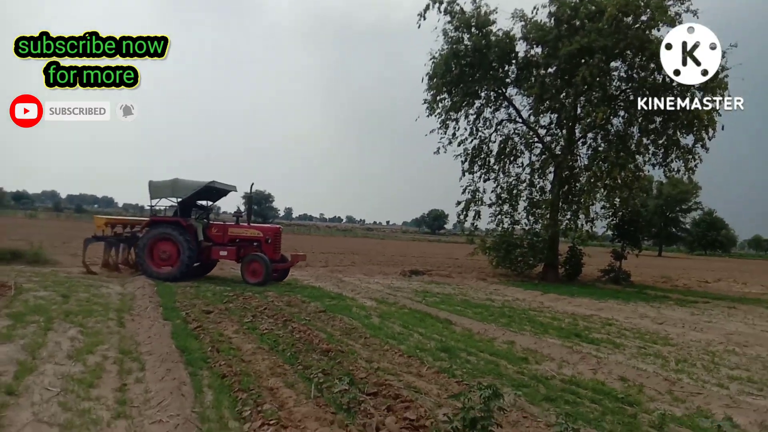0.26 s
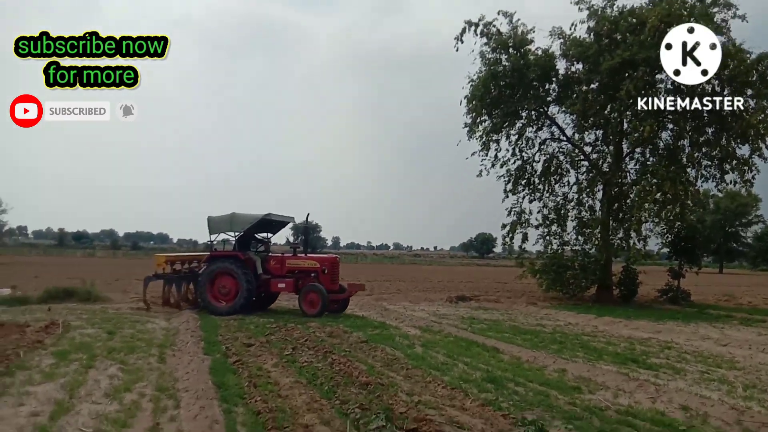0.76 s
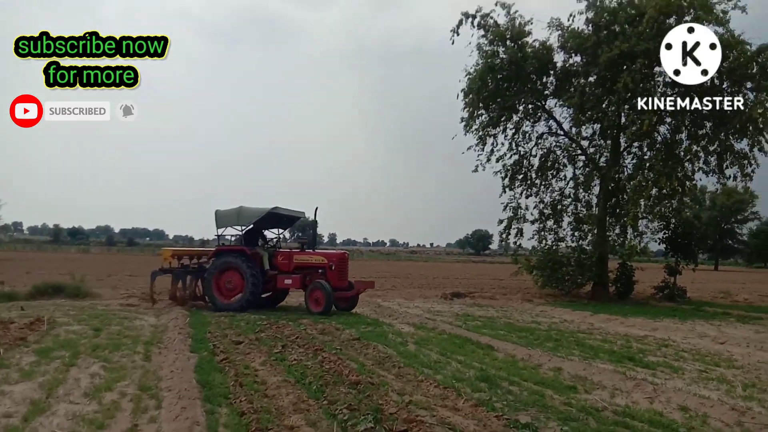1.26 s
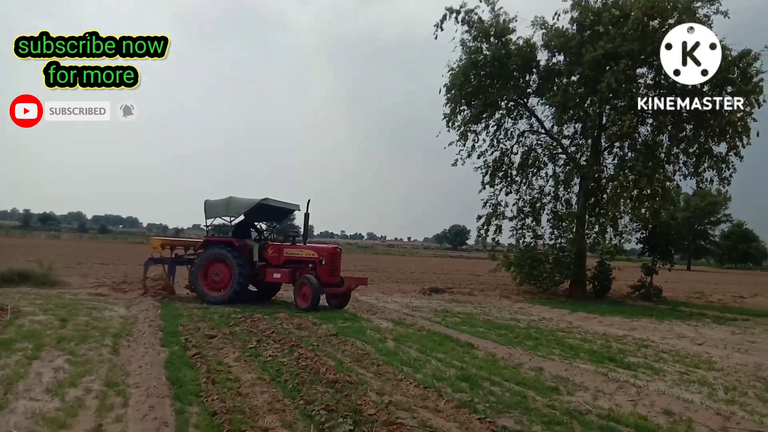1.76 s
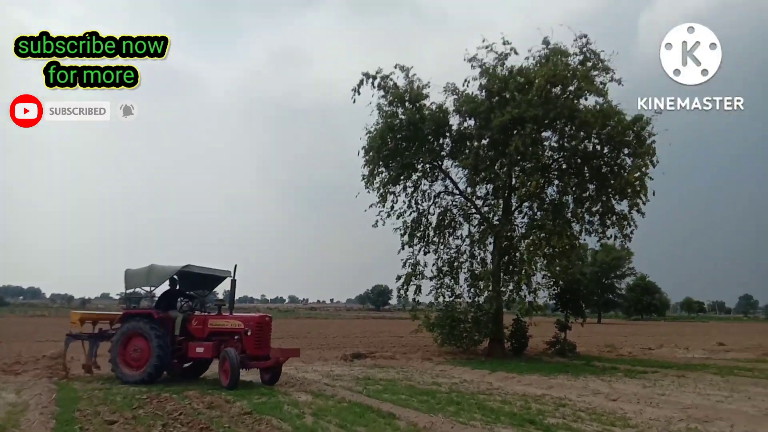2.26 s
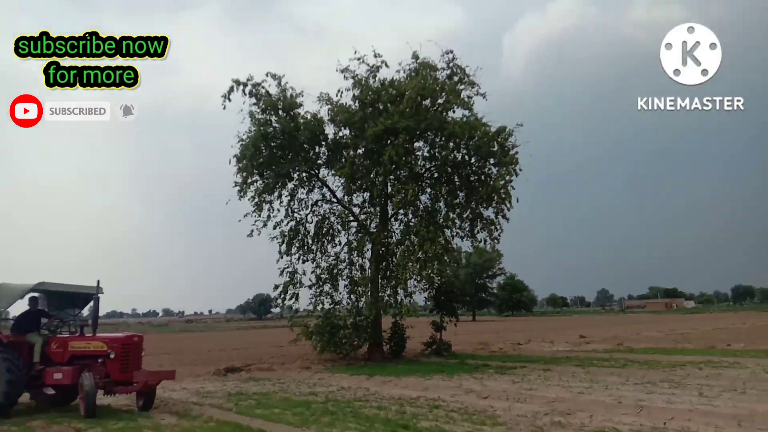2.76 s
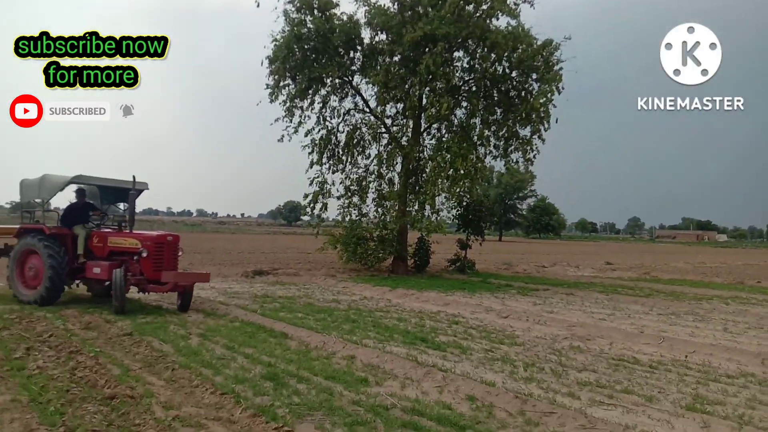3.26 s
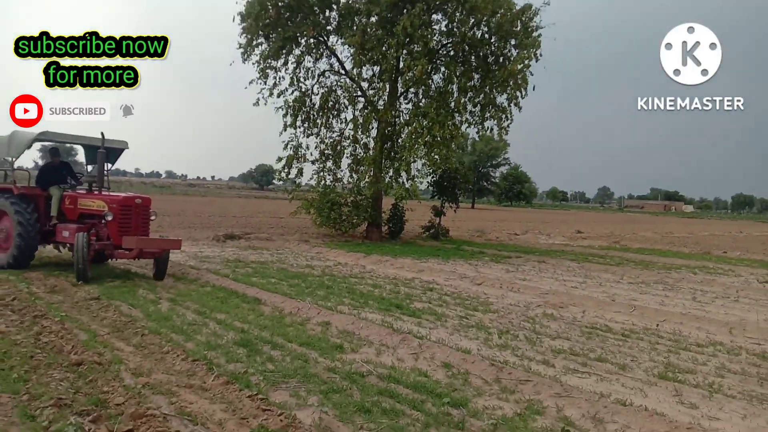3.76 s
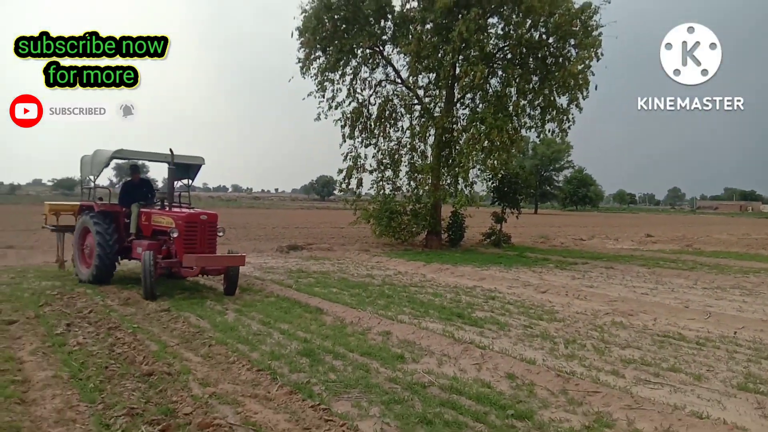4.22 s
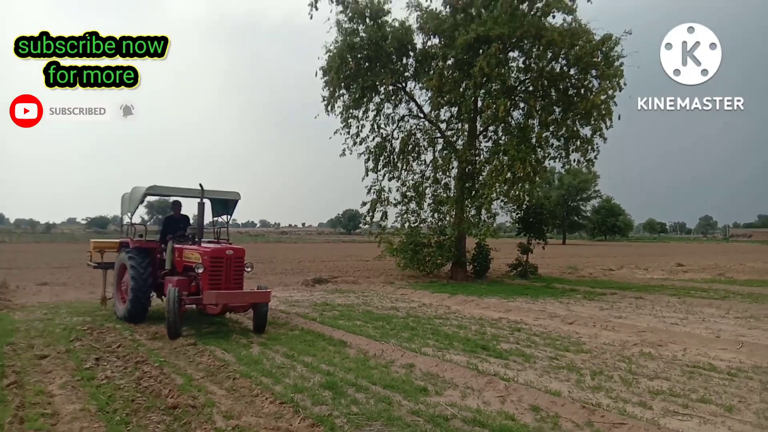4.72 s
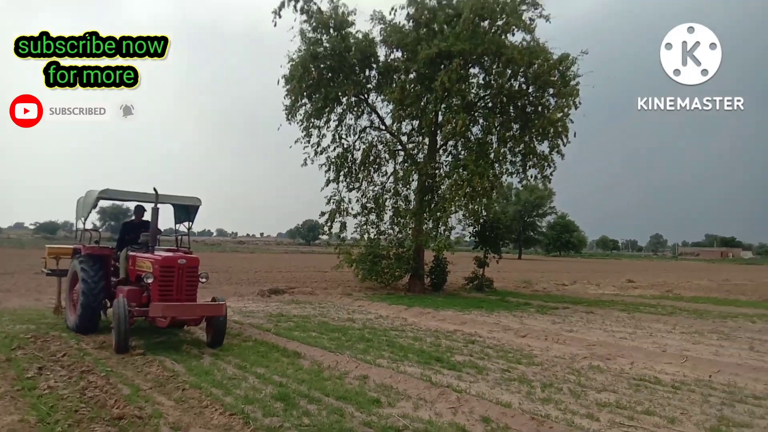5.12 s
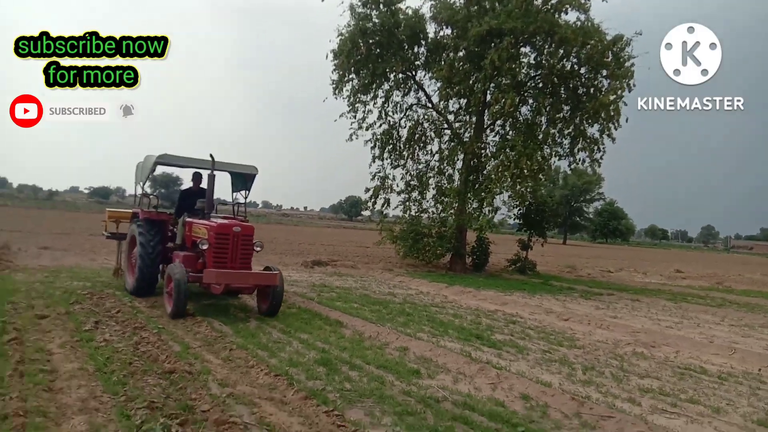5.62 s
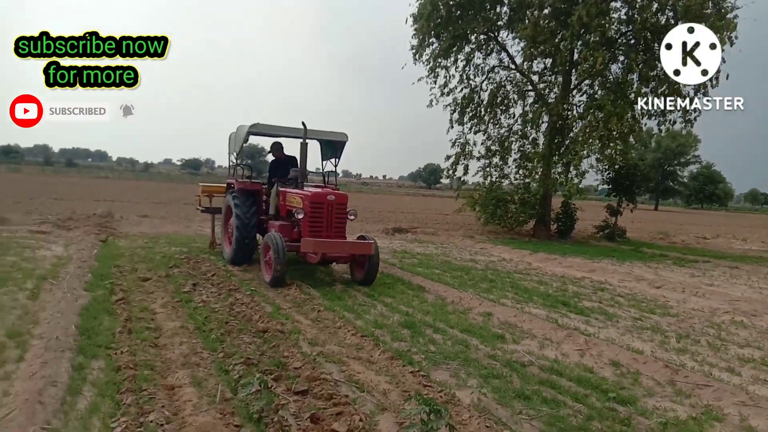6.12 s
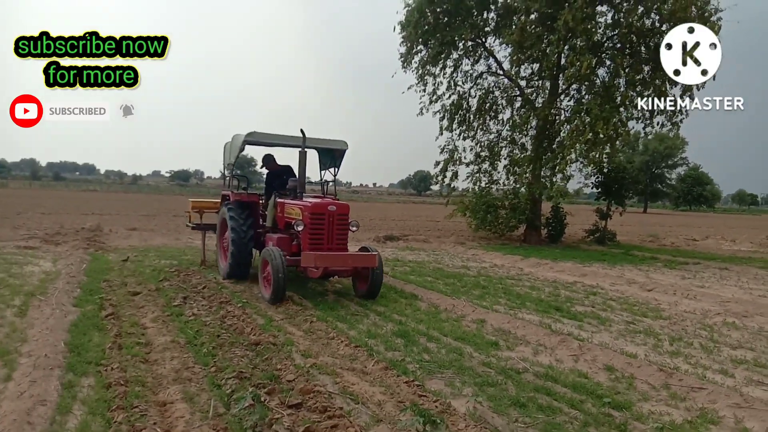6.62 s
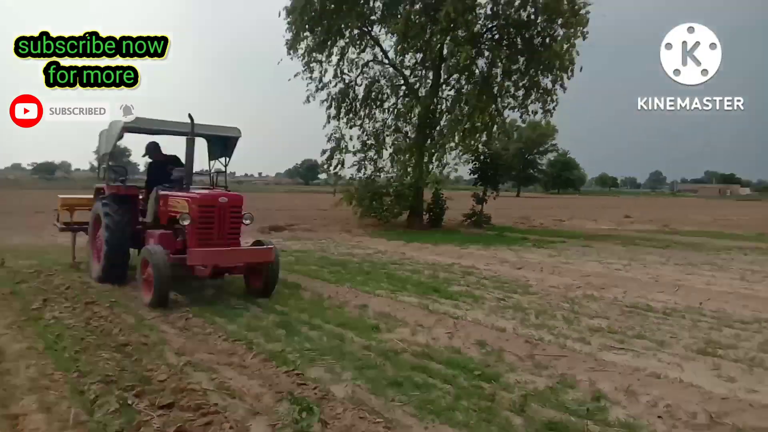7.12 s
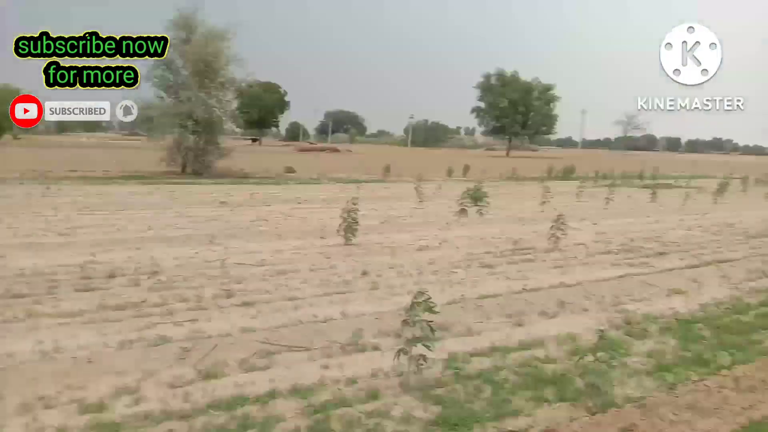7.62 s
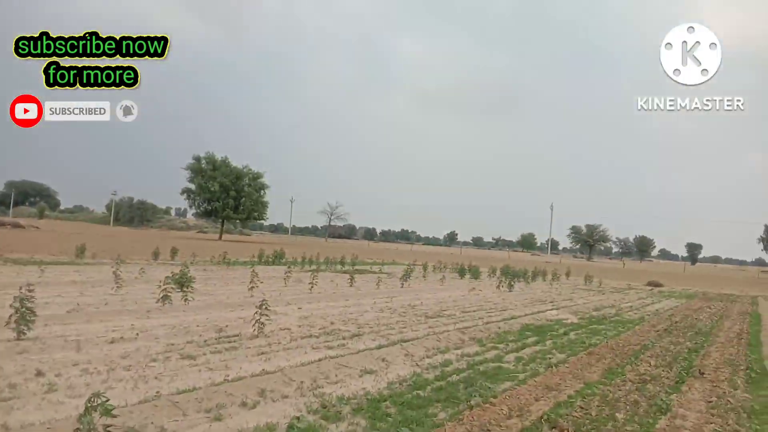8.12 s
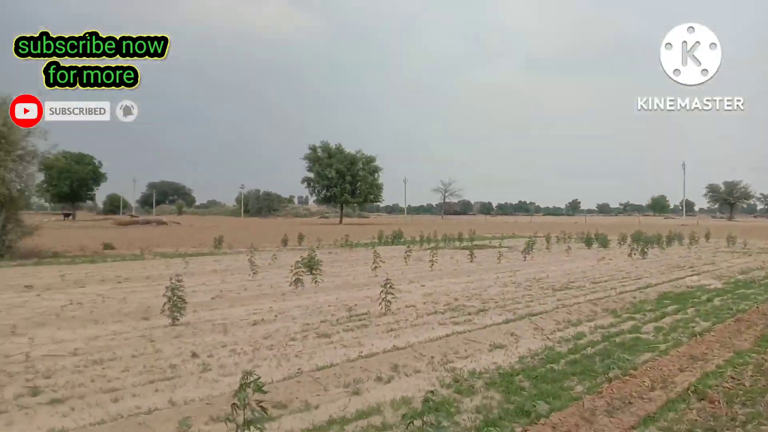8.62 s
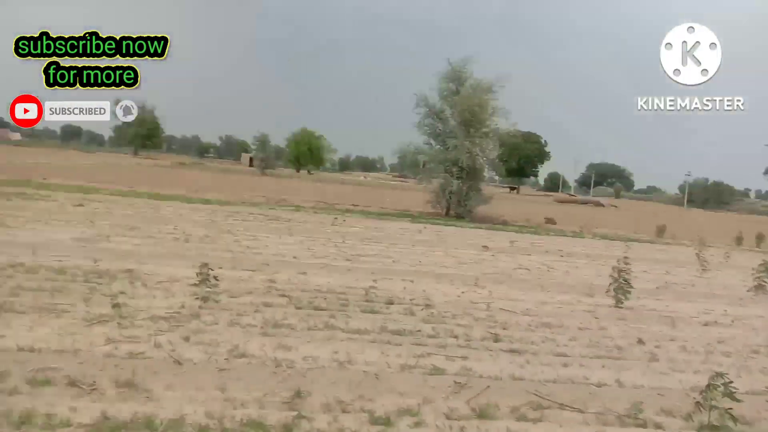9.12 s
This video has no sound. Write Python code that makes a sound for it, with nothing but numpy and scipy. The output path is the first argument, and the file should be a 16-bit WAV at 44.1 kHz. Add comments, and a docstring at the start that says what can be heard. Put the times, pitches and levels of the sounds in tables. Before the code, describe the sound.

A diesel tractor knocks and rattles nearer across a windy open field, gusts thumping the microphone, then revs up close and clear in shelter.

```python
"""Wind buffets the microphone in an open field as a diesel tractor draws near, pulling a seed drill.
Each firing knocks on the block and puffs from the exhaust; gears and drill rattle in between.
A small bird chips early on; dry ticks follow close by. Gusts slap the port and a limiter ducks the engine.
After seven seconds metal squeaks, the microphone turns into some shelter and the engine speeds up, close by.
Pulsed noise, ringing modes and sines make the machine; shaped noise and single pops make the wind."""
import sys
import numpy as np
from scipy import signal
from scipy.fft import rfft, irfft, next_fast_len
from scipy.io import wavfile
from scipy.ndimage import uniform_filter1d

SR = 44100
rng = np.random.default_rng(int(sys.argv[2]) if len(sys.argv) > 2 else 0)


def generate_wav(sig):
    """Save sig (samples, or channels by samples) to the path in sys.argv[1] as 16-bit PCM at SR."""
    pcm = np.round(np.clip(np.atleast_2d(sig).T, -1, 1) * 32767).astype(np.int16)
    wavfile.write(sys.argv[1], SR, pcm)


N = 413658
TIME = np.arange(N) / SR  # s

# engine speed: start_s, firing_rate [firings per s]
ENGINE_SPEED = [(0.0, 27.28), (0.4, 28.49), (0.8, 27.35), (2.4, 27.71), (3.2, 27.33), (4.8, 27.5),
                (5.2, 28.22), (5.6, 27.47), (6.4, 28.13), (6.85, 27.83), (7.8, 31.05), (8.6, 32.48),
                (9.38, 32.9)]
# engine as the tractor nears and the microphone turns: start_s, knock_db, clatter_db [relative levels]
ENGINE_LEVEL = [(0, -35.5, -43.5), (2.4, -30, -40.5), (4, -30, -39.5), (4.9, -29.5, -42.5),
                (5.7, -30.5, -41.5), (6.4, -26, -37.5), (7.2, -25, -41), (7.4, -20.5, -36.5),
                (7.55, -19.5, -31), (7.9, -29, -36.5), (8.2, -27, -31), (8.65, -24, -32.5),
                (9.0, -21, -31.5), (9.38, -20, -33.5)]
BREEZE_DB = -12.5  # strength of a fresh breeze, the reference for the wind


def tractor():
    """Knock, clatter, gears, hiss and exhaust all follow the crankshaft."""
    # spells in which the strokes flare brighter or fade: centre_s, half_length_s, gain_db
    flares = [(.85, 0.13, 2.5), (1.203, 0.043, 7), (1.884, 0.021, 10), (2.46, 0.081, 15.5),
              (2.78, 0.099, 6.5), (3, 0.044, 6), (3.316, 0.079, 9), (3.8, 0.33, 1.5), (4.14, 0.093, -4),
              (4.665, 0.023, 11), (4.944, 0.092, 11), (5.617, 0.029, 7.5), (7.043, 0.12, 15.5),
              (7.15, 0.022, -7), (7.317, 0.055, 13), (7.424, 0.022, -6), (7.777, 0.042, 7),
              (8.024, 0.028, 12)]
    # turbulent air makes the distant engine flicker, less so close by: start_s, share [0-1]
    flicker_share = [(0, 1), (7.1, 1), (7.7, .42), (8.6, .42), (8.9, .6), (9.38, .6)]
    # top treble of the strokes: start_s, level_db [before the flares]
    hiss_level = [(0, -65), (1.2, -60), (2.1, -59), (2.5, -67), (3.2, -63), (3.8, -60), (4.8, -67),
                  (5.3, -69), (6.2, -60), (7.2, -59.5), (7.7, -49.5), (8.3, -54), (8.85, -49), (9.2, -63),
                  (9.38, -64)]
    # colour of that treble: pitch_hz, density_db [relative, per Hz]
    hiss_spectrum = [(6500, 6), (8000, 6), (9500, -1), (10600, -15.5), (11800, -5.5), (13600, -17),
                     (14500, -1.5), (15200, 2.5), (15800, -4.5)]
    # exhaust note: start_s, level_db
    exhaust_level = [(0, -31), (4, -30), (5, -31), (7.2, -20), (7.8, -29.5), (8.5, -27.5), (8.8, -28.5),
                     (9.38, -22)]

    knock_db, clatter_db = in_time(ENGINE_LEVEL)
    flare_db = sum(db * bell(s, half_s) for s, half_s, db in flares)
    flicker, = in_time(flicker_share)
    turns = .52 + np.cumsum(in_time(ENGINE_SPEED)[0]) / SR  # counted in firings
    clicks = firings(turns, uneven_db=1.6 * flicker, alternate_db=.6, jitter_s=0.0006)

    block = from_db(knock_db) * knock(clicks, ring_db=-10.0, thud_db=-11.0, shift_db=3.3 * flicker)
    metal = clatter(clicks, shift_db=4.2 * flicker, ring_db=-3)
    valves = from_db(clatter_db + 0.77 * flare_db - 4.0) * metal  # clatter takes part of each flare
    strokes = bursts(clicks, rise_s=0.0044, decay_s=0.0061, between=0.19, grain_db=5.0)
    hiss = from_db(in_time(hiss_level)[0] + flare_db) * colour(noise() * strokes, hiss_spectrum)
    thrum = from_db(in_time(exhaust_level)[0]) * exhaust(turns, rough_db=3 * flicker)
    gear = running_gear(level_db=-35.5, clicks=clicks)
    return shadow(block + gear + reflection(valves) + sizzle(clicks)) + hiss + thrum


def firings(turns, uneven_db, alternate_db, jitter_s):
    """One click per firing, strong and weak in turn, each a little different in time and force."""
    at = np.flatnonzero(np.diff(np.floor(turns)))
    late, force = rng.standard_normal((len(at), 2)).T
    places = np.clip(at + (late * jitter_s * SR).astype(int), 0, N - 1)
    clicks = np.zeros(N)
    clicks[places] = from_db(uneven_db[at] * force + alternate_db * np.cos(np.pi * turns[at]))
    return clicks


def bursts(clicks, rise_s, decay_s, between, grain_db):
    """Envelope: each firing sets off a quick flurry of metal impacts over the steady rattle of the gears."""
    age = TIME[:SR // 10]
    swell = (1 - np.exp(-(age / rise_s) ** 2)) * np.exp(-age / decay_s)
    envelope = signal.fftconvolve(clicks, swell / swell.max())[:N]
    return np.sqrt(envelope ** 2 + between ** 2) * from_db(grain_db * drift(1500))


def knock(clicks, ring_db, thud_db, shift_db):
    """Combustion rings the modes of the block, in a new mix every stroke, over a dense spread of weaker ones."""
    # ringing of block and bonnet: pitch_hz, width_hz, level_db [relative]
    block_modes = [(540, 160, -9), (1010, 100, -11), (1248, 65, 2), (1618, 70, -1), (1820, 220, -7),
                   (2210, 70, 0), (2530, 260, -9), (2930, 70, -12)]
    # the dense spread: pitch_hz, density_db [relative, per Hz]
    thud_spectrum = [(200, -13.5), (400, -9), (800, 2.5), (1300, 10), (1900, 10), (2600, -6), (3200, -16.5),
                     (4200, -41)]
    blows = bursts(clicks, rise_s=.005, decay_s=.006, between=.15, grain_db=1.5)
    modes = ringing(blows * noise(), block_modes, shift_db, drift_rate=31)
    modes = signal.sosfilt(signal.butter(2, 3200, fs=SR, output="sos"), modes)
    return from_db(ring_db) * rms_one(modes) + from_db(thud_db) * colour(blows * noise(), thud_spectrum)


def ringing(drive, modes, shift_db, drift_rate):
    """Modes of alternating sign ring together, each wandering in strength."""
    out = 0
    for k, (hz, width_hz, db) in enumerate(modes):
        strength = from_db(db + shift_db * drift(drift_rate))
        out = out + (-1) ** k * strength * resonance(drive, hz, width_hz)
    return out


def clatter(clicks, shift_db, ring_db, count=16):
    """Injectors and valve gear rattle in many bands and ring the cover, a few standing out at each stroke."""
    # ringing of valve cover and injector pipes: pitch_hz, width_hz, level_db [relative]
    cover_modes = [(2560, 110, 1), (2850, 90, -2), (3550, 50, -3), (3840, 45, -2), (4085, 60, -1),
                   (4350, 110, -2), (4980, 150, -4), (5450, 160, -7)]
    # colour of the rattle: pitch_hz, density_db [relative, per Hz]
    rattle_spectrum = [(2000, -12.5), (2800, 8), (3500, 4.5), (4200, 3.5), (5000, -5.5), (5900, -2),
                       (6600, -3), (7400, -1.5), (8300, -11), (9500, -28), (11000, -44.5)]
    strokes = bursts(clicks, rise_s=.0045, decay_s=.0095, between=.15, grain_db=2.2)
    edges_hz = np.geomspace(2200, 10000, count + 1)
    white = noise(), noise()  # neighbouring bands take turns, so they stay independent
    rattle = 0
    for k in range(count):
        band = signal.butter(2, edges_hz[k:k + 2], "band", fs=SR, output="sos")
        rattle = rattle + signal.sosfilt(band, white[k % 2]) * from_db(shift_db * drift(20.0))
    ring = ringing(strokes * noise(), cover_modes, shift_db, drift_rate=25)
    ring = signal.sosfilt(signal.butter(2, [2000, 6500], "band", fs=SR, output="sos"), ring)
    return rms_one(colour(rattle * strokes, rattle_spectrum) + from_db(ring_db) * rms_one(ring))


def exhaust(turns, rough_db):
    """Low harmonics of the firing rate waver in strength; the pipe favours those nearest its own note."""
    # exhaust harmonics: multiple [of the firing rate], level_db [relative, before the pipe]
    harmonics = [(.5, -20), (1, -18), (1.5, -13), (2, 2), (2.5, -9), (3, 0), (3.5, -11), (4, 1), (4.5, -9),
                 (5, -9), (5.5, -13), (6, -13), (6.5, -12), (7, -11), (8, -14), (10, -13), (12, -11)]
    pipe_hz, pipe_width_hz = 112, 50
    rate, = in_time(ENGINE_SPEED)
    out = 0
    for k, db in harmonics:
        pipe = 1 / np.sqrt(1 + (2 * (k * rate - pipe_hz) / pipe_width_hz) ** 2)
        tone = np.sin(2 * np.pi * (k * turns + rng.random()))
        out = out + pipe * from_db(db + rough_db * drift(6)) * tone
    return rms_one(out)


def running_gear(level_db, clicks):
    """Gears, tyres and tines drone, louder as the tractor nears; the gears whine, jolted by each firing."""
    # even drone: pitch_hz, density_db [relative, per Hz]
    drone_spectrum = [(300, -9.5), (520, 4.5), (720, -1), (1000, 3.5), (1500, -4), (2500, -3), (3400, -19)]
    # gear whine: pitch_hz, width_hz
    whine_bands = [(1255.5, 94), (1610, 140), (2225, 92)]
    # each whine as the tractor turns: start_s, low_db, middle_db, high_db
    whine_level = [(0, -47.5, -49, -54.5), (3.8, -41.5, -45, -59), (4.5, -37, -49, -52),
                   (5.0, -38.5, -45, -39), (5.6, -49, -42, -49), (6.4, -37, -48, -37),
                   (7.5, -39, -44, -43.5), (8.5, -47, -53, -51), (9.38, -29, -29, -34)]
    knock_db = in_time(ENGINE_LEVEL)[0]
    nearness_db = .5 * (knock_db - knock_db.mean())
    drone = from_db(level_db + nearness_db) * colour(noise() * from_db(2.85 * drift(59)), drone_spectrum)
    jolts = bursts(clicks, rise_s=.003, decay_s=.007, between=.4, grain_db=1)
    whine = 0
    for (hz, width_hz), db in zip(whine_bands, in_time(whine_level)):
        once = resonance(jolts * noise(), hz, width_hz)
        whine = whine + from_db(db) * rms_one(resonance(once, hz, width_hz))
    return drone + whine


def sizzle(clicks):
    """Bright edge of each stroke, heard only with the port towards the engine; its colour follows the turn."""
    # extra treble while the port points at the engine: start_s, level_db [relative]
    facing = [(7.4, -86), (7.6, -49), (7.8, -42), (8.25, -37.5), (8.6, -38), (8.9, -45), (9.1, -54),
              (9.38, -83)]
    # its colour when pointing straight at the engine: pitch_hz, density_db [relative, per Hz]
    straight_spectrum = [(2700, -10), (3600, 4), (4400, 7.5), (5700, -3.5), (6600, -6.5), (8000, -21),
                         (9200, -17.5), (10500, -17.5), (12500, -30.5), (14000, -34), (15500, -40)]
    strokes = bursts(clicks, rise_s=0.0033, decay_s=0.0037, between=0.26, grain_db=-2)
    points_hz, points_db = np.transpose(straight_spectrum)

    def colour_db(hz, s):
        # the whole spectrum slides in pitch with the cancelled band
        centre_hz = shadow_at(s)[0]
        straight_hz = np.maximum(hz, 1) * centre_hz.max() / centre_hz
        low_cut_db = 40 * np.log10(np.minimum(straight_hz / points_hz[0], 1))
        return np.interp(np.log(straight_hz), np.log(points_hz), points_db) + low_cut_db

    return from_db(in_time(facing)[0] + 0.5) * rms_one(sliding(noise() * strokes, colour_db))


def reflection(x):
    """A close echo combs the treble; the stripes slide as its path changes."""
    # echo as tractor and microphone move: start_s, lag_ms, strength [0-1]
    echo_path = [(0, .98, .25), (2.1, .96, .25), (2.3, .78, .2), (2.6, .83, .4), (3.3, .86, .5),
                 (3.8, .97, .6), (4.2, 1.12, .5), (4.6, 1.06, .05), (5.2, 1, .1), (5.6, .97, .2),
                 (7, .97, .2), (7.4, .97, 0)]
    lag_ms, strength = in_time(echo_path)
    fine = signal.resample_poly(x, 4, 1)  # finer steps for a smooth moving delay
    echo = np.interp(TIME - lag_ms / 1000, np.arange(4 * N) / (4 * SR), fine)
    return (x + strength * echo) / np.sqrt(1 + strength ** 2)


def shadow_at(s):
    """Sound bending round the recorder cancels a band that slides as it turns: its centre and depth."""
    # cancelled band: start_s, centre_hz, depth_db
    shadow_path = [(0, 3300, 7), (.5, 3400, 7), (.9, 3680, 10), (1.5, 3500, 6), (2.05, 3450, 5),
                   (2.3, 4400, 9), (2.8, 4150, 6), (3.5, 4050, 4), (4.15, 3200, 7), (4.7, 3050, 4),
                   (5.2, 3250, 5), (5.8, 3580, 10), (6.8, 3550, 10), (7.2, 3400, 4), (7.38, 4900, 8),
                   (7.6, 5150, 13), (7.8, 6000, 8), (8.1, 6350, 6), (8.7, 6300, 6), (9.0, 5750, 12),
                   (9.15, 5200, 14), (9.38, 4800, 12)]
    at, hz, depth_db = np.transpose(shadow_path)
    return np.interp(s, at, hz), np.interp(s, at, depth_db)


def shadow(x):
    """The cancelled band sweeps through the engine's treble."""
    width = .085  # share of the centre pitch

    def dip_db(hz, s):
        centre_hz, depth_db = shadow_at(s)
        return -depth_db * np.exp(-((hz / centre_hz - 1) / width) ** 2)

    return sliding(x, dip_db)


def squeak(waver):
    """Dry metal rubs and sings for a moment, a sine of wavering pitch."""
    # brief squeak: start_s, level_db
    squeak_level = [(7.15, -80), (7.2, -41), (7.24, -33), (7.28, -55), (7.35, -97)]
    pitch_hz = 7040 * (1 + waver * drift(120))
    level_db, = in_time(squeak_level)
    sounding = (TIME > squeak_level[0][0]) & (TIME < squeak_level[-1][0])
    return sounding * from_db(level_db) * np.sin(2 * np.pi * np.cumsum(pitch_hz) / SR)


def wind(rumble_db, buffet_db, lumps_db, eddies_db, sway_db, sway_follows, flutter_db):
    """Eddies at the microphone port: a lumpy rumble, with sharper flaps in the strong gusts."""
    # wind colours, from the largest eddies to the smallest: pitch_hz, density_db [relative, per Hz]
    sway_spectrum = [(15, -12.5), (32, -7.5), (48, -9), (62, 2.5), (90, 15), (160, -8)]
    rumble_spectrum = [(20, -41), (33, -34.5), (45, -60), (58, -15), (78, -2.5), (120, 2), (180, 0),
                       (260, -5), (360, -12), (600, -52.5)]
    buffet_spectrum = [(150, 0.5), (250, 1), (340, 0), (480, -3), (700, -14), (1000, -22), (1400, -44.5),
                       (2200, -87)]
    flutter_spectrum = [(400, 0.5), (650, 12.5), (900, 3.5), (1250, 6), (1550, -8), (2400, -41.5)]
    buffet_growth, flutter_growth = 1.74, 3.66  # dB per dB of wind: stronger wind is brighter
    force_db = wind_strength() - BREEZE_DB
    lumps = lumps_db * drift(49)
    flaps = from_db(lumps + eddies_db * np.tanh(drift(240)))
    rumble = from_db(rumble_db + force_db) * colour(noise() * from_db(lumps), rumble_spectrum)
    buffet = from_db(buffet_db + buffet_growth * force_db) * colour(noise() * flaps, buffet_spectrum)
    # large slow eddies outlast the lulls; the smallest stand out only in the hardest gusts
    sway = from_db(sway_db + sway_follows * force_db) * colour(noise(), sway_spectrum)
    flutter = from_db(flutter_db + flutter_growth * force_db) * colour(noise() * flaps, flutter_spectrum)
    return sway + rumble + buffet + flutter


def wind_strength():
    """The wind in dB: a slow swell, with brief lulls cut out of it and gusts laid on top."""
    # swell, falling away as the microphone finds shelter: start_s, strength_db
    wind_swell = [(0, -13.5), (.55, -18), (.7, -15.5), (.8, -7), (1.0, -13), (1.55, -13.5), (2.15, -18.5),
                  (2.3, -12.5), (2.42, -5.5), (2.52, -8.5), (2.64, -4.5), (2.78, -11), (2.95, -12),
                  (3.42, -10), (3.8, -13), (4.18, -9.5), (4.45, -15.5), (5.0, -20.5), (5.35, -11),
                  (5.6, -19), (5.8, -14.5), (5.97, -8), (6.15, -13.5), (6.3, -11), (6.5, -12), (6.9, -9.5),
                  (7.47, -10.5), (7.7, -46), (8.62, -51), (8.75, -30), (9.38, -34)]
    # brief lulls: centre_s, half_length_s, depth_db
    lulls = [(0, 0.032, 18), (0.64, 0.026, 11), (1.706, 0.018, 9), (2.967, 0.039, 7.5), (3.22, 0.11, 7.5),
             (4.5, 0.034, 9), (4.948, 0.022, 14), (5.61, 0.038, 13.5), (6.672, 0.044, 9)]
    # single gusts added to the swell: centre_s, half_length_s, peak_db
    gusts = [(1.268, 0.017, -17), (1.887, 0.1, -21), (3.154, 0.031, -13.5), (6.377, 0.033, -15),
             (8.014, 0.025, -18.5), (8.123, 0.053, -16.5), (8.287, 0.024, -21), (8.375, 0.024, -18.5),
             (8.713, 0.019, -26.5), (9.159, 0.013, -23), (9.275, 0.026, -22.5)]
    swell_db = in_time(wind_swell)[0] - sum(depth * bell(s, half_s) for s, half_s, depth in lulls)
    gust = sum(from_db(db) * bell(s, half_s) for s, half_s, db in gusts)
    return 20 * np.log10(from_db(swell_db) + gust)


def slaps(per_s, level_db, low_hz, high_hz, crowding):
    """In hard gusts single eddies slap the port, each a short dull pop; they crowd as the wind rises."""
    force = from_db(wind_strength() - BREEZE_DB)
    born = rng.random(N) < per_s * force ** crowding / SR
    clicks = born * rng.uniform(0.41, 1, N) * rng.choice([-1, 1], N) * np.minimum(force, 2)
    dull = signal.butter(3, high_hz, fs=SR, output="sos")
    pops = signal.sosfilt(dull, clicks + 1e-18) * SR / (2 * high_hz)
    return from_db(level_db) * signal.sosfilt(signal.butter(1, low_hz, "high", fs=SR, output="sos"), pops)


def hard_slaps(cycles):
    """A big eddy strikes the port: one push with a trough on either side."""
    # hardest eddies, slaps in the open and soft thumps in the shelter:
    # centre_s, pitch_hz, peak_db [before the port rounds it off]
    big_eddies = [(.83, 650, -11), (1.021, 550, -11), (1.553, 500, -9), (1.907, 500, -10), (2.499, 550, -6),
                  (2.569, 650, -11), (2.599, 650, -8), (2.628, 603, -8), (2.649, 650, -6),
                  (3.112, 500, -18), (3.143, 600, -8), (3.406, 550, -10), (3.486, 620, -8),
                  (3.766, 550, -7), (5.849, 553, -10), (5.901, 550, -5), (5.94, 550, -2), (6.328, 550, -13),
                  (6.354, 500, -14), (6.542, 555, -8), (7.017, 550, -13), (7.498, 500, -6),
                  (8.022, 130, -10), (8.078, 150, -13), (8.123, 190, -9), (8.358, 120, -13),
                  (8.702, 110, -18), (9.141, 190, -12), (9.168, 120, -10), (9.26, 300, -15)]
    out = np.zeros(N)
    age = (np.arange(SR // 10) - SR // 20) / SR
    for s, hz, db in big_eddies:
        start = int(s * SR) - SR // 20
        push = np.exp(-(age * hz / cycles) ** 2) * np.cos(2 * np.pi * hz * age)
        out[start:start + len(age)] += from_db(db) * push
    return out


def chips(drop_hz, drop_s, decay_s, scatter_db):
    """Thin high chips, probably a small bird: each drops onto its pitch and leaves a short scattered tail."""
    # chips: start_s, pitch_hz, peak_db [before the tail]
    bird_calls = [(.258, 7450, -46), (.394, 7200, -41), (0.501, 7300, -42), (.631, 7140, -40),
                  (.994, 7600, -47), (1.094, 7300, -46), (1.195, 7400, -42), (2.058, 7900, -60)]
    age, out = TIME[:SR // 10], np.zeros(N)
    for s, hz, db in bird_calls:
        pitch_hz = hz + drop_hz * np.exp(-age / drop_s)
        swell = age / drop_s * np.exp(1 - age / drop_s)
        note = swell * np.sin(2 * np.pi * np.cumsum(pitch_hz) / SR)
        scatter = rng.standard_normal(len(age)) * np.exp(-age / decay_s)
        scatter = scatter / np.linalg.norm(scatter)
        tail = from_db(scatter_db) * signal.fftconvolve(note, scatter)[:len(age)]
        start = int(s * SR)
        out[start:start + len(age)] += from_db(db) * (note + tail)
    return out


def ticks(decay_s, low_hz):
    """Small dry ticks close to the microphone: bright snaps of noise that die within milliseconds."""
    # ticks: start_s, level_db [relative]
    tick_times = [(2.124, -23), (2.143, -36), (3.43, -36)]
    envelope = 0
    for s, db in tick_times:
        envelope = envelope + from_db(db) * (TIME >= s) * np.exp(-np.abs(TIME - s) / decay_s)
    return signal.sosfilt(signal.butter(2, low_hz, "high", fs=SR, output="sos"), envelope * noise()) / 2


def port_hiss(level_db, follow):
    """Steady hiss at the ring of the microphone port, growing a little with the engine's clatter."""
    ring_hz, width_hz = 7450, 750
    clatter_db = in_time(ENGINE_LEVEL)[1]
    ring = resonance(resonance(noise(), ring_hz, width_hz), ring_hz, width_hz)
    return from_db(level_db + follow * (clatter_db - clatter_db.mean())) * rms_one(ring)


def from_db(db):
    """Decibels to gain."""
    return np.exp(np.asarray(db) * (np.log(10) / 20))


def rms_one(x):
    """Scale to unit power."""
    return x / np.sqrt(np.mean(x ** 2) + 1e-20)


def in_time(rows):
    """Each column of a curve at every sample."""
    s, *columns = np.transpose(rows)
    return [np.interp(TIME, s, column) for column in columns]


def bell(s, half_s):
    """A smooth bump of height 1."""
    return np.exp(-np.minimum(((TIME - s) / half_s) ** 2, 50))


def noise():
    """White noise."""
    return rng.standard_normal(N)


def drift(rate, size=16):
    """Smooth chance with about this many changes a second; spread 1."""
    count = next_fast_len(N // size + 2)  # drawn at every 16th sample, then joined by lines
    bins_hz = np.arange(count // 2 + 1) * SR / size / count
    slow = irfft(rfft(rng.standard_normal(count)) * np.exp(-(bins_hz / rate) ** 2), count)
    return np.interp(np.arange(N) / size, np.arange(count), rms_one(slow))


def colour(x, spectrum):
    """Give a sound a smooth spectrum that falls away outside its ends; unit power."""
    hz, level_db = np.transpose(spectrum)
    log_hz = np.log(np.maximum(np.arange(N // 2 + 1) * SR / N, 1))
    outside = np.abs(log_hz - np.clip(log_hz, np.log(hz[0]), np.log(hz[-1])))
    gain_db = np.interp(log_hz, np.log(hz), level_db) - 20 * outside
    return rms_one(irfft(rfft(x) * from_db(gain_db), N))


def resonance(x, hz, width):
    """Two-pole resonance with gain 1 on top."""
    r = np.exp(-np.pi * width / SR)
    zeros = np.array([1, 0, -1]) * (1 - r * r) / 2
    poles = [1, -2 * r * np.cos(2 * np.pi * hz / SR), r * r]
    return signal.lfilter(zeros, poles, x)


def sliding(x, gain_db):
    """A filter that changes with time; gain_db(hz, s) is its response."""
    hz, s, frames = signal.stft(x, SR, nperseg=512, boundary="even")
    return signal.istft(frames * from_db(gain_db(hz[:, None], s)), SR)[1][:N]


def limiter(x):
    """Power over the threshold turns everything down at once, so the engine ducks in gusts; gain creeps back."""
    threshold_db, share_removed, release_db_per_s, detect_s = -14, 0.81, 85, 0.0067
    span = max(int(detect_s * SR), 1)
    level_db = 10 * np.log10(np.abs(uniform_filter1d(x ** 2, span)) + 1e-12)
    excess_db = np.maximum(level_db - threshold_db, 0)
    # the excess is held at its peak and falls along a straight slope
    release_db = release_db_per_s * TIME
    held_db = np.maximum.accumulate(excess_db + release_db, axis=-1) - release_db
    return x * from_db(-share_removed * uniform_filter1d(held_db, span))


def scene():
    """The tractor behind the wind, whose strongest pushes are rounded off at the port."""
    air = wind(rumble_db=-12.5, buffet_db=-19.0, lumps_db=2.5, eddies_db=8.0,
               sway_db=-27.5, sway_follows=0.3, flutter_db=-39.0)
    air = air + slaps(per_s=26, level_db=-14.5, low_hz=300, high_hz=800, crowding=1.6)
    air = air + hard_slaps(cycles=0.6)
    top = 1.86  # highest push the port passes
    machine = tractor() + squeak(waver=0.0028)
    nearby = ticks(decay_s=0.0012, low_hz=6000)
    bird = chips(drop_hz=900, drop_s=0.0014, decay_s=0.017, scatter_db=6)
    hiss = port_hiss(level_db=-59.0, follow=0.31)
    return (machine + bird + nearby + hiss + top * np.tanh(air / top))[None]


def record(dry):
    """The port cancels one band, the limiter acts, then a steep cut ends the treble."""
    dip_hz, dip_width_hz, cutoff_hz = 6620, 650, 15700
    notched = dry - .87 * resonance(dry, dip_hz, dip_width_hz)
    return signal.sosfilt(signal.ellip(10, .1, 80, cutoff_hz, fs=SR, output="sos"), limiter(notched))


dry = scene()
out = record(dry)
generate_wav(out)
```